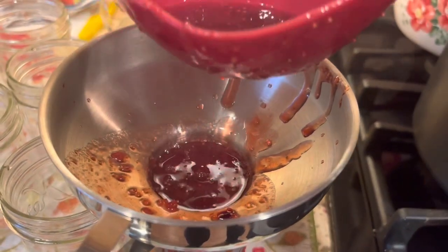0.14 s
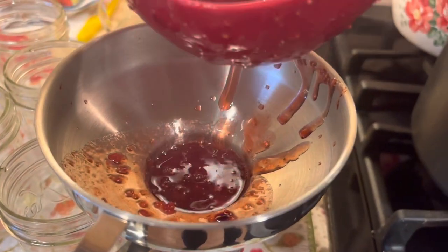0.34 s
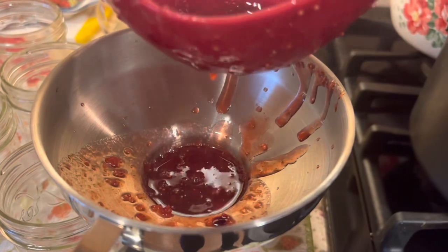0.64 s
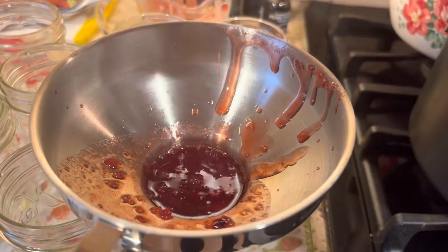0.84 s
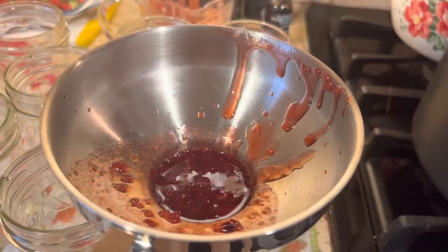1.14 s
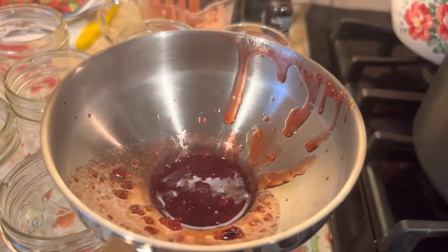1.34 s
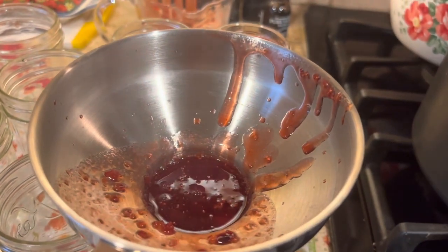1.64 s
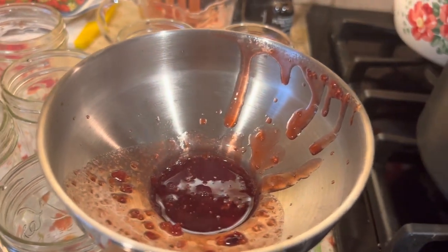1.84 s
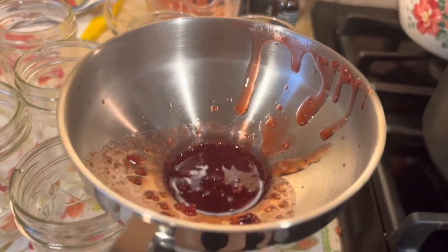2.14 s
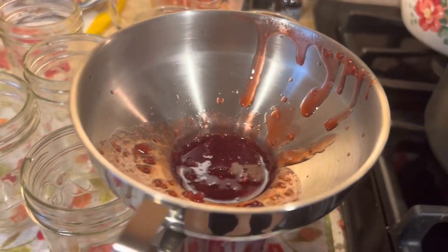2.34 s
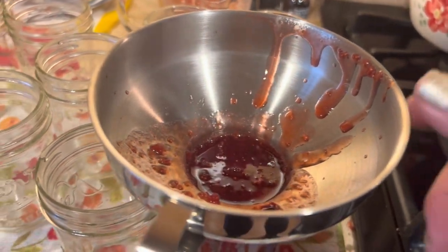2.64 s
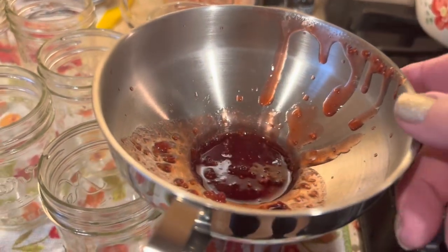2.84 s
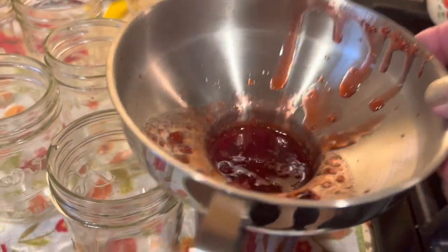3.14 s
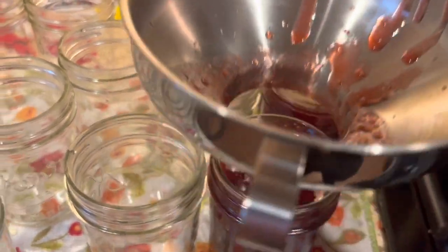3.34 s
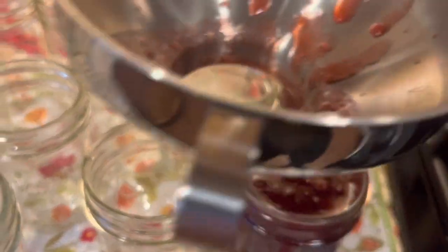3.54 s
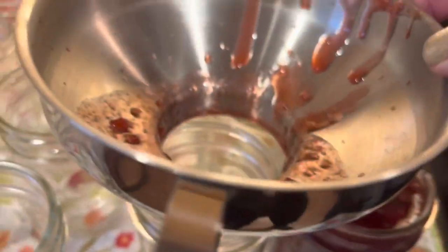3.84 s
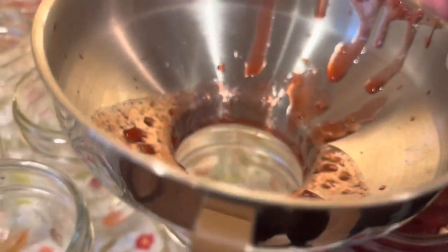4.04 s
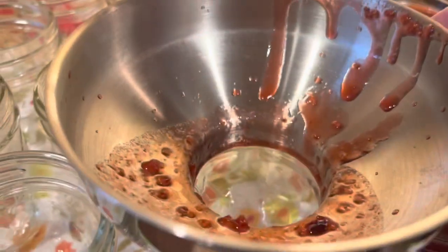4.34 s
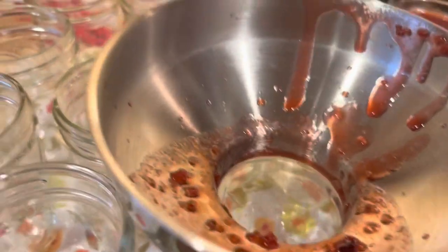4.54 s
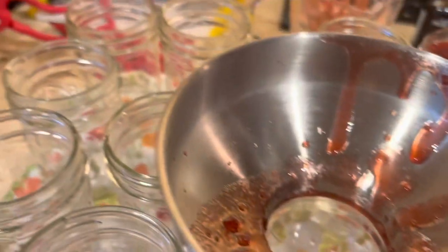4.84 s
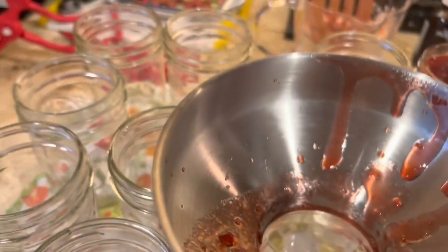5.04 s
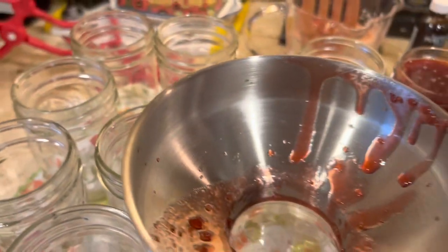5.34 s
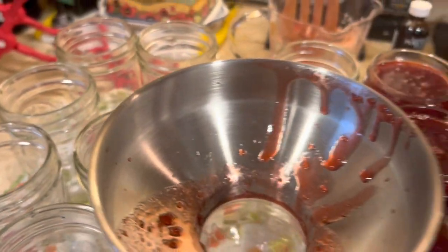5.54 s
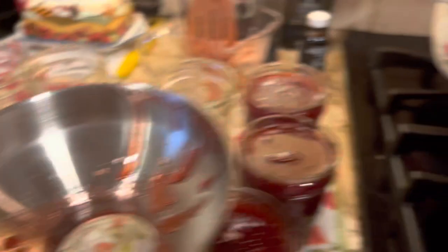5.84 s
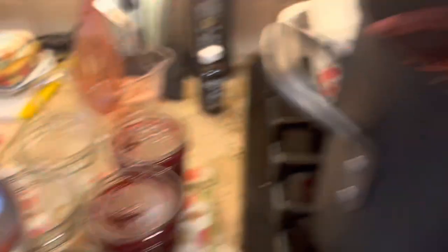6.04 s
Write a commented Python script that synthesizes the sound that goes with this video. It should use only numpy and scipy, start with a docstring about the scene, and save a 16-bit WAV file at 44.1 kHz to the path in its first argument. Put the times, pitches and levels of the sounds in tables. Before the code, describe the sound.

In a quiet, humming kitchen, a ladle clatters briefly in a pot, then a metal funnel rattles and clinks against glass jars.

```python
"""A steel funnel is lifted off one jar, rocks against the rim and is seated on the next; a gripping hand damps
its ring. Earlier, a ladle is laid back in a pot. Each blow is a tick and a burst of chatter that drive metal
modes. Shoes, sleeves and fingers scuff, a finger drags on the funnel rim; there are faint ticks, squeaks and
pings, and one dull knock near the end, probably a footstep. An appliance hums in the quiet kitchen; a phone's
two microphone ports hear it all, with the room's tail."""
import sys
import numpy as np
from scipy import signal
from scipy.fft import rfft, irfft, next_fast_len
from scipy.io import wavfile
from scipy.ndimage import uniform_filter1d

SR = 44100
rng = np.random.default_rng(int(sys.argv[2]) if len(sys.argv) > 2 else 0)


def generate_wav(signal):
    """Clip the signal to [-1, 1] and save it as 16-bit WAV at the path in sys.argv[1]."""
    frames = np.transpose(np.atleast_2d(signal))
    scaled = np.clip(frames, -1, 1) * 32767
    pcm = np.round(scaled).astype(np.int16)
    wavfile.write(sys.argv[1], SR, pcm)


N = 272979
FFT_SIZE = next_fast_len(N)

# Funnel touching a jar. Each row: mode in Hz, gain in dB, t60 in seconds before damping.
FUNNEL_CONTACT_MODES = [(150, -11, 0.19), (254, -7, 0.16), (417, -11, 0.15), (608, 0.5, 0.067),
                        (720, -19.5, 0.072), (902, 3, 0.02), (1483, -2.5, 0.068), (1635, -9, 0.046),
                        (2158, -5.5, .04), (2360, -14, .04), (2670, -8, .05), (3060, -1.5, 0.017),
                        (3106, -9, 0.065), (3098, -5, 0.019), (3400, -0.5, 0.021), (3356, -5.5, 0.029),
                        (3760, -7, .04), (4236, -13, 0.032), (4680, -11, 0.071), (5540, -4, 0.057),
                        (5830, 0.5, .05), (6470, -5.5, 0.056), (7390, 3.5, 0.055), (7650, -3, .05),
                        (8515, -7.5, 0.06), (9350, -4, .03), (11330, -3, 0.15), (11400, -17, 0.07),
                        (12130, -9, 0.07), (14800, -10, .05)]
# Port imbalance. Each row: frequency in Hz, left minus right in dB.
PORT_BALANCE = [(60, 3.5), (400, 3), (1300, 2.5), (2400, 4.5), (4400, 4), (8000, 1), (15000, .5)]


def undb(db):
    return 10 ** (np.asarray(db) / 20)


def at_rms(x, db):
    return x * undb(db) / np.sqrt(np.mean(x ** 2))


def along(table, hz):
    """Read a (Hz, value) table on a log-frequency axis."""
    knots_hz, values = np.transpose(table)
    return np.interp(np.log(hz + 1), np.log(knots_hz + 1), values)


def band(x, hz, width_hz):
    """Resonant band-pass, gain 1 at the centre."""
    return signal.lfilter(*signal.iirpeak(hz, hz / width_hz, fs=SR), x)


def steep_band(x, hz, width_hz):
    return band(band(x, hz, width_hz), hz, width_hz)


def add(track, start_s, x):
    i = int(start_s * SR)
    track[i:i + len(x)] += x[:len(track) - i]


def ring(force, modes, colour, damping):
    """Decaying modes; each takes its share of the energy, a little different at every contact spot."""
    out = 0
    for (hz, db, t60_s), spot in zip(modes, rng.uniform(-1, 1, len(modes))):
        pole = np.exp(2j * np.pi * hz / SR - np.log(1000) * damping / (t60_s * SR))
        mode = signal.lfilter([1], [1, -pole], force).imag
        norm = 1 / np.sqrt(2 * (1 - abs(pole) ** 2) * np.sum(mode ** 2))
        out = out + np.sign(spot) * undb(db + along(colour, hz) + 2 * abs(spot)) * norm * mode
    return out


def blows(hits, contact_modes, free_modes, free_dampings, corners_hz, contact_damping, wash_t60_s):
    """Tick and chatter drive contact modes and free-body modes; dense modes blur into a noisy wash."""
    out, t = np.zeros(N), np.arange(SR // 3) / SR
    bass_hz, mid_hz, treble_hz = corners_hz
    waver_db, waver_samples = 2.5, int(0.0098 * SR)  # loose contact makes the free ring waver
    highpass = signal.butter(2, bass_hz / 5, "high", fs=SR, output="sos")  # small bodies radiate little bass
    for hit, free_damping in zip(hits, free_dampings):
        start_s, db, bass_db, treble_db, ring_db, wash_db, chatter_s = hit
        chatter = rng.standard_normal(len(t)) * (rng.random(len(t)) < .3) * np.exp(-t / chatter_s)
        force = 0.85 * chatter + (t == 0)
        colour = [(bass_hz, bass_db), (mid_hz, 0), (treble_hz, treble_db), (2 * treble_hz, treble_db - 5)]
        waver = uniform_filter1d(rng.standard_normal(len(t)), waver_samples) * np.sqrt(waver_samples)
        noise = rng.standard_normal(len(t)) * 1000. ** (-t / wash_t60_s)
        wash = sum(undb(along(colour, hz)) * steep_band(noise, hz, hz) * np.sqrt(SR / (3 * hz))
                   for hz in bass_hz * 2. ** np.arange(5))
        free = undb(ring_db + waver_db * waver) * ring(force, free_modes, colour, free_damping)
        contact = ring(force, contact_modes, colour, contact_damping)
        # a soft contact lasts longer, so its click loses treble too
        cutoff_hz = min(.67 * treble_hz * 2 ** (max(treble_db + 40, 0) / 10), .45 * SR)
        lowpass = signal.butter(4, cutoff_hz, fs=SR, output="sos")
        add(out, start_s, undb(db) * signal.sosfilt(lowpass, undb(wash_db) * wash + free + contact))
    return signal.sosfilt(highpass, out)


def room_air():
    """Steady stereo hush; the bass reaches both ports alike."""
    # Each row: frequency in Hz, relative spectral density in dB.
    spectrum = [(25, -22.5), (39, -16), (57, 4), (76, -11), (135, -5), (170, -18), (330, -13), (650, -21),
                (1300, -37.5), (2200, -48), (4500, -57), (8000, -55.5), (10000, -66), (12000, -59),
                (14000, -69)]
    # Each row: frequency in Hz, left-right coherence from 0 to 1.
    coherence = [(60, 1), (130, 0.87), (290, 0.8), (640, 0.0), (1410, 0.28), (3100, 0.3), (6820, 0.41),
                 (15000, 0)]
    hz = np.fft.rfftfreq(FFT_SIZE, 1 / SR)
    alike = along(coherence, hz)
    left, unrelated = rfft(rng.standard_normal((2, FFT_SIZE))) * undb(along(spectrum, hz))
    right = alike * left + np.sqrt(1 - alike ** 2) * unrelated
    lean = undb(alike * along(PORT_BALANCE, hz) / 2)
    air = irfft(np.array([left * lean, right / lean]), FFT_SIZE)[:, :N]
    return at_rms(air, db=-53)


def appliance_hum():
    """Noise through narrow resonances makes a wavering hum."""
    # Each row: centre in Hz, width in Hz, RMS level in dB.
    resonances = [(58, 28, -57), (145, 20, -69.5), (3300, 400, -95)]
    return sum(at_rms(steep_band(rng.standard_normal(N), hz, width_hz), db)
               for hz, width_hz, db in resonances)


def small_pings():
    """Faint ticks, squeaks and pings, and one low knock: single modes that swell and decay."""
    # Each row: start in seconds, pitch in Hz, peak in dB, rise in seconds, t60 in seconds.
    pings = [(.785, 5030, -63, 0.00018, 0.0017), (1.162, 6500, -49, 0.000091, 0.001),
             (1.162, 15600, -64, 0.00025, 0.0067), (2.935, 960, -56.5, 0.00073, 0.017),
             (2.988, 990, -63, .001, 0.016), (3.559, 1656, -76, 0.046, 0.29), (3.561, 3300, -88, .04, 0.2),
             (4.32, 2240, -41.5, .001, 0.067), (4.702, 1380, -63, 0.025, 0.12),
             (4.865, 4210, -64, 0.007, 0.15), (4.864, 4090, -59.5, 0.0066, 0.077),
             (4.866, 4570, -66, 0.006, 0.053), (5.66, 2730, -79, 0.028, 0.17),
             (6.074, 407, -38, 0.0028, 0.028), (6.073, 1100, -42, 0.0011, 0.027),
             (5.743, 5190, -66.5, 0.0019, 0.014)]
    out, t = np.zeros(N), np.arange(SR // 2) / SR
    for start_s, hz, db, rise_s, t60_s in pings:
        swell = (1 - np.exp(-t / rise_s)) * 1000. ** (-t / t60_s)
        add(out, start_s, undb(db) * swell / swell.max() * np.sin(2 * np.pi * hz * t))
    return out


def ladle_and_knock():
    """The ladle clatters in the pot, whose wall rings; later one dull knock, probably a footstep."""
    # Each row: start in seconds, gain in dB, relative bass, treble, free ring and wash in dB,
    # chatter decay in seconds.
    hits = [(1.554, -57, 7.5, -29, 10, -8, 0.0066), (1.574, -57.5, 3.5, -31, 10.5, 6, 0.018),
            (1.617, -33, -21, -30, 7.5, -3, 0.0067), (1.667, -50, -8.5, -32, 9, 17, 0.01),
            (1.820, -52, 9, -29, -3, -5.5, 0.0079), (1.871, -56.5, 21, 13.5, -7, 4, 0.0093),
            (1.883, -45, 13, -29, -7.5, 2, 0.0041), (1.905, -44.5, -3, -56, 3, -25, 0.0034),
            (6.069, -46, -13.5, -35, 1, -22, .004)]
    # Each row of both: mode in Hz, gain in dB, t60 in seconds before damping.
    ladle_modes = [(216, -12, 0.12), (417, 2, 0.13), (760, 2, 0.052), (886, -33, 0.013), (1100, 2.5, 0.13),
                   (1372, 10, 0.021), (1790, 0.5, 0.02), (2480, -44, 0.019), (3300, 7.5, 0.014),
                   (4100, -9, 0.0093), (5020, 5.5, 0.01), (6500, 2, 0.016), (7100, -14, 0.019),
                   (8300, -22, 0.0067), (11900, -27, 0.027), (15000, -3, 0.04)]
    wall_modes = [(140, 2, 0.042), (186, 11.5, 0.067), (199.2, -18, 0.028), (216, 7.5, 0.061),
                  (315, -15, 0.056), (427, 9.5, 0.096), (1100, -34, 0.13), (6350, -15, 0.13),
                  (7300, -9, 0.11)]
    return blows(hits, ladle_modes, wall_modes, free_dampings=np.ones(len(hits)),
                 corners_hz=(400, 1400, 6000), contact_damping=1.53, wash_t60_s=0.047)


def scuffs():
    """Shoe, sleeve and finger rub as gritty noise in four bands; each stroke swells, then dies away."""
    # Each row: start, rise and t60 in seconds, mid gain in dB, relative bass, treble and top in dB.
    strokes = [(2.795, 0.035, 0.056, -86.5, 14, -7, 25.5), (3.018, 0.0072, 0.11, -88, 17.5, -29, -28),
               (4.854, 0.012, .25, -73.5, -11, -18, -33), (5.148, 0.046, 0.24, -63.5, 8, -3, -39),
               (5.36, 0.032, 0.31, -67, 4.5, -17, -40), (5.54, .012, .3, -88, 9, -16, -30),
               (5.64, 0.042, 0.41, -83, 8, -23, -30), (5.81, .02, 1, -84.5, 8.5, -8, -29),
               (6.006, 0.035, 0.076, -59, 0.5, -16, -30), (6.065, .01, 0.31, -79.5, 7, -0.5, -35)]
    # Mid, bass, treble, top. Each row: centre in Hz, width in Hz.
    bands = [(1890, 2950), (593, 1000), (6300, 1940), (12100, 1100)]
    # Each row: mode in Hz, width in Hz, gain in dB.
    surface_modes = [(430, 60, 4), (1250, 90, 4), (1600, 100, 8), (1950, 100, 4), (2950, 130, 8),
                     (3500, 130, 4), (4200, 150, 6), (5200, 200, 3), (7300, 200, 7)]
    rubbing, t = 0, np.arange(N) / SR
    for k, (hz, width_hz) in enumerate(bands):
        grains = rng.standard_normal(N) * undb(3.7 * np.minimum(rng.exponential(size=N), 5.5))
        envelope = 0
        for start_s, rise_s, t60_s, db, *colour_db in strokes:
            rise = np.clip((t - start_s) / rise_s, 0, 1)
            decay = 1000. ** (-np.maximum(t - start_s - rise_s, 0) / t60_s)
            envelope = envelope + undb(db + ([0] + colour_db)[k]) * rise * decay
        rubbing = rubbing + envelope * at_rms(steep_band(grains, hz, width_hz), 0)
    return rubbing + sum(undb(db) * band(rubbing, hz, width_hz) for hz, width_hz, db in surface_modes)


def rim_rub():
    """A dragging finger rasps briefly and wakes the funnel's modes."""
    # Each row: start and end in seconds, RMS level in dB.
    drags = [(2.797, 2.87, -75), (5.65, 5.73, -88)]
    # Each row: frequency in Hz, mode gain in dB.
    colour = [(1500, -12), (2700, 4.5), (3500, -6), (4300, 5), (5200, -12), (9000, -23)]
    out, t = np.zeros(N), np.arange(SR // 5) / SR
    for start_s, end_s, db in drags:
        progress = t / (end_s - start_s)
        rasp = rng.standard_normal(len(t)) * np.clip(6 * progress, 0, 1) * np.clip(1 - progress, 0, 1)
        add(out, start_s, at_rms(ring(rasp, FUNNEL_CONTACT_MODES, colour, damping=0.66), db))
    return out


def rocking_hits():
    """The lifted funnel rocks like a bounce: each gap shorter, each touch weaker and duller."""
    first_s, first_gap_s, shrink = 3.177, .0384, .8
    bass_db, wash_db, chatter_s = 7, -18, .0015
    hits = []
    for i in range(6):
        start_s = first_s + first_gap_s * (1 - shrink ** i) / (1 - shrink)
        db, treble_db = -61 - i, -30 - 4 * i
        ring_db = 2.5 + 1.5 * i  # grows as the funnel comes free
        hits.append((start_s, db, bass_db, treble_db, ring_db, wash_db, chatter_s))
    return hits


def funnel_on_jars():
    """The funnel rocks, then knocks on a jar rim; from 4 s the hand grips it and its ring dies sooner."""
    # Each row: start in seconds, gain in dB, relative bass, treble, free ring and wash in dB,
    # chatter decay in seconds.
    knocks = [(3.900, -31, 2.5, -1, -2, 7.5, .002), (3.91, -30.5, -16.5, -3, 4, 6.5, .004),
              (3.924, -42, 3.5, -10, 6, 3, .003), (4.0894, -64, 7, -13.5, 11.5, 1, .002),
              (4.144, -49, -4.5, -0.5, 1.5, -6, .012), (4.226, -33.5, -4.5, -1.5, 2, 6, .002),
              (4.2309, -28, -12, -9.5, -7, 4, .003), (4.238, -38, -10, -15.5, -3.5, -6.5, .005),
              (4.3168, -44, 2.5, -10.5, -9, -3.5, .005), (4.4246, -16, -9.5, -17, -15.5, -4, .0008),
              (4.4299, -17, -12.5, -2.5, -12, -7, .003), (4.4342, -12, -23.5, -9, -21, -1, .004),
              (4.4435, -28.5, -14, 0.5, -15, 4.5, .006), (4.602, -41, -4.5, -27, -12.5, -4.5, .002)]
    # Funnel held by its edge; the close pair near 2.7 kHz beats.
    # Each row: mode in Hz, gain in dB, t60 in seconds before damping.
    free_modes = [(1556, -26, 0.38), (2735, 1, 0.24), (2757, -8, 0.34), (5810, -20, 0.36),
                  (5717, -25.5, 0.51), (7456, -6, .11), (8450, -11.5, .11), (10300, -16, .11),
                  (10520, -16.5, .13), (10500, -18.5, .11), (13420, -22.5, .18), (14920, -14, .11),
                  (15400, -19, .08)]
    grip_s, grip_damping = 4.0, 3.5
    hits = rocking_hits() + knocks
    free_dampings = [grip_damping if start_s > grip_s else 1 for start_s, *_ in hits]
    return blows(hits, FUNNEL_CONTACT_MODES, free_modes, free_dampings,
                 corners_hz=(700, 3300, 6500), contact_damping=1.7, wash_t60_s=0.076)


def ports(x, side=((0, 0),)):
    """The two microphone ports sit apart and face differently: level and phase differ with pitch."""
    # Each row: frequency in Hz, left ahead of right in radians.
    phase_lead = [(0, 0), (700, 1.02), (1400, -1.6), (2750, 0.87), (4100, 1.16), (6200, 1.2), (7600, 1.23),
                  (9000, -0.2), (11700, -5.5), (16400, -12)]
    hz = np.fft.rfftfreq(FFT_SIZE, 1 / SR)
    lean = undb((along(PORT_BALANCE, hz) + along(side, hz)) / 2)
    lead_rad = np.interp(hz, *np.transpose(phase_lead))
    response = np.array([lean, np.exp(-1j * lead_rad) / lean])
    return irfft(rfft(x, FFT_SIZE) * response, FFT_SIZE)[:, :N]


def room_tail(x):
    """Diffuse tail, the top band dying first; only its bass is alike at the two ports."""
    # Each row: centre in Hz, t60 in seconds, gain in dB.
    bands = [(188, .3, -22), (790, 0.13, -17.5), (1720, 0.31, -23.5), (3200, 0.34, -23.5),
             (6960, 0.23, -18.5), (12000, 0.092, -17)]
    t, tail = np.arange(SR // 2) / SR, 0
    build_up_s = 0.048
    for hz, t60_s, db in bands:
        mid, side = band(rng.standard_normal((2, len(t))), hz, 0.34 * hz)
        pair = mid + min(hz / 1200, 1) * side * np.array([[1], [-1]])
        tail = tail + at_rms(pair, db) * 1000. ** (-t / t60_s) / np.sqrt(t60_s * SR / 14)
    return signal.fftconvolve(x[None], tail * np.minimum(t / build_up_s, 1), axes=1)[:, :N]


def scene():
    """Handling sounds reach the ports direct and wake the room, over air and hum."""
    # Pot and knock lie further right. Each row: frequency in Hz, left minus right in dB.
    far_side = [(60, 1.5), (380, -4), (1290, -6.5), (2400, -3), (4400, 0.5), (8000, 0)]
    far_send_db = 7.5  # further off, so the room answers more
    funnel = funnel_on_jars()
    far = ladle_and_knock()
    near = funnel + scuffs() + small_pings() + rim_rub()
    direct = ports(near) + ports(far, far_side)
    reverb = room_tail(near + undb(far_send_db) * far)
    return direct + reverb + room_air() + ports(appliance_hum())


def record(dry):
    """The phone cuts the top."""
    cutoff_hz = 16400
    return signal.sosfilt(signal.ellip(10, .2, 90, cutoff_hz, fs=SR, output="sos"), dry)


dry = scene()
out = record(dry)
generate_wav(out)
```